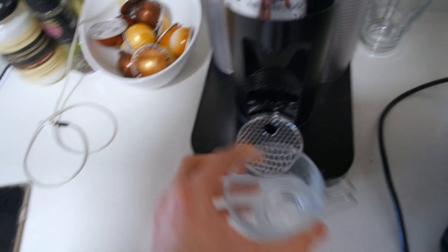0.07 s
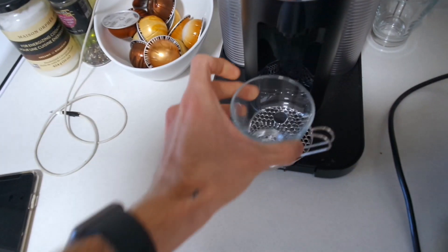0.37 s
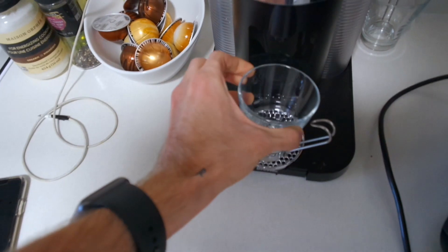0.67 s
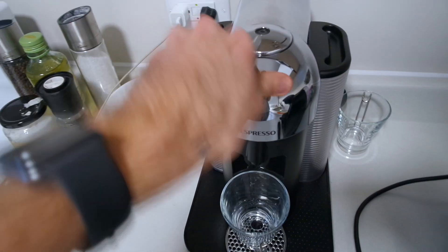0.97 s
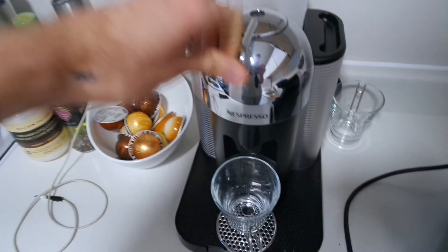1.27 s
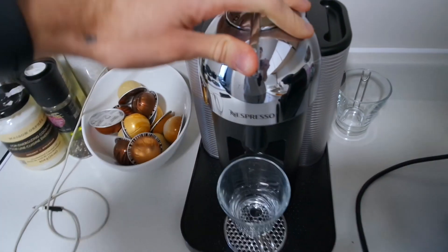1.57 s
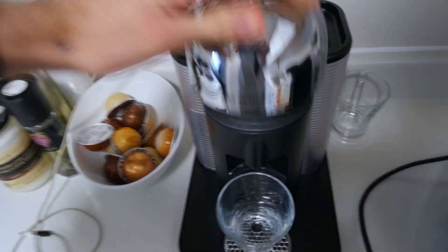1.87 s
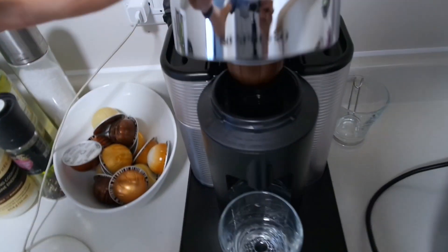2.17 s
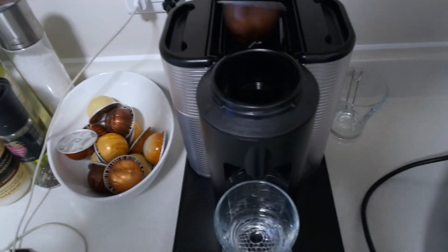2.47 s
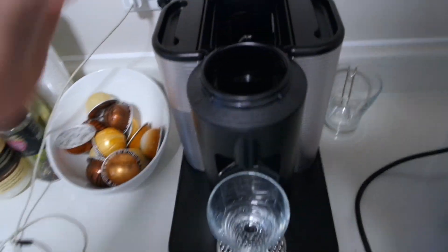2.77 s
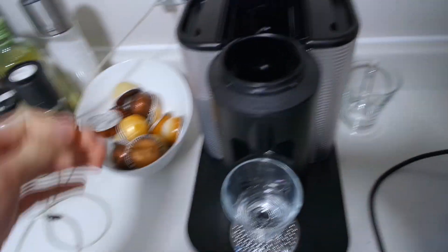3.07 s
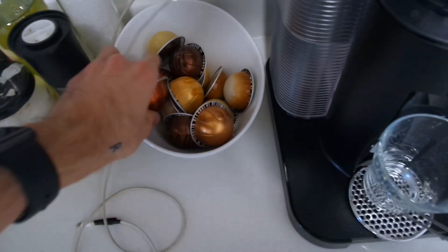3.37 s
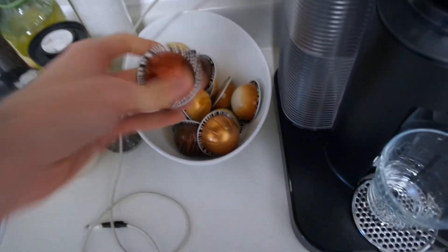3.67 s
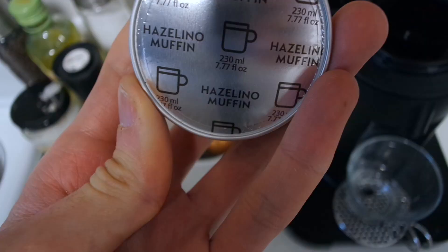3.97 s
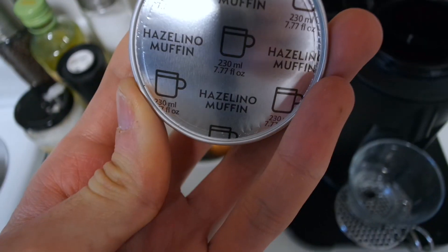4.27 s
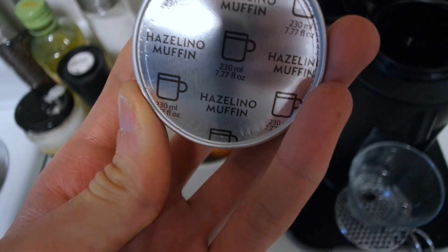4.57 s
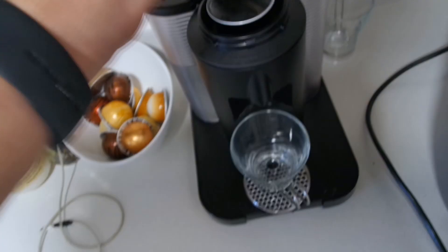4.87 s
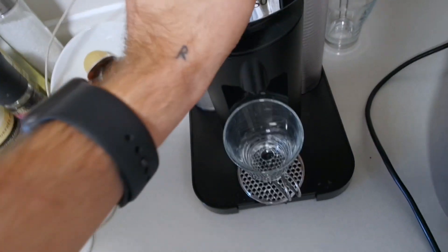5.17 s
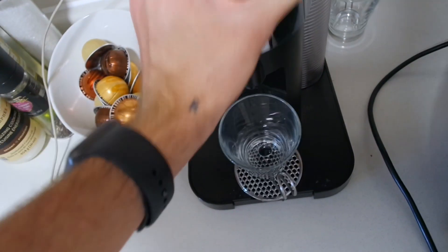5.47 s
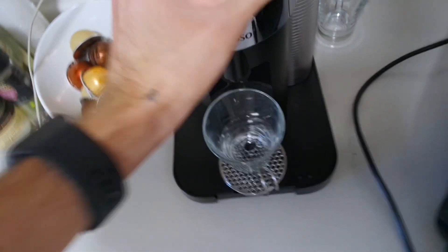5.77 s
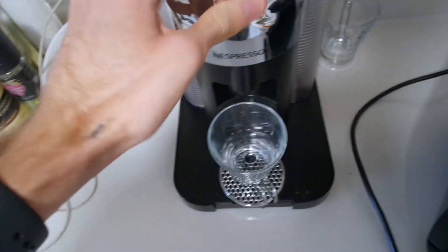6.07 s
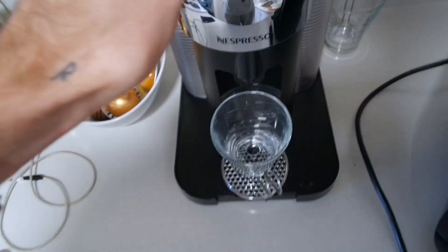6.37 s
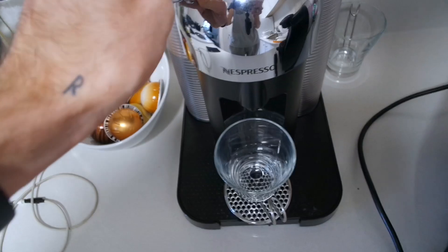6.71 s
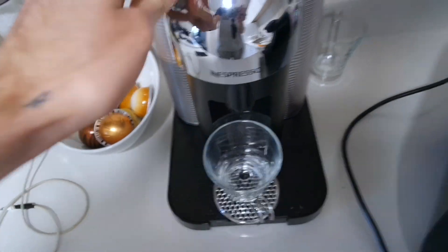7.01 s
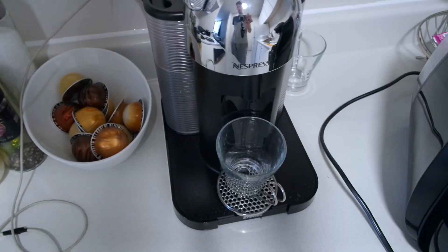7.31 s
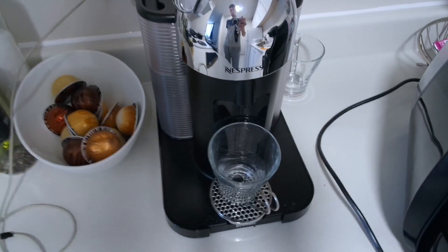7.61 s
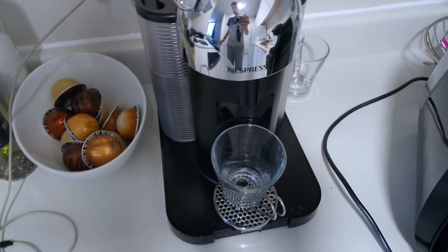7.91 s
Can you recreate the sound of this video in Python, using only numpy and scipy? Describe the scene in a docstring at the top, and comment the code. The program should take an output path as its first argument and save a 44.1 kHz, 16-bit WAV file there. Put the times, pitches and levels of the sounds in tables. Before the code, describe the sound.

Close kitchen handling: a glass rings down, a coffee machine lid clacks open, capsules rattle, the lid locks and the motor starts whirring.

```python
"""A capsule coffee machine on a kitchen counter, heard through one hand-held microphone.
A glass rings down onto the drip grid. The plastic lid unlocks and springs open, and the spent capsule
tumbles into the bin. A fresh one clinks out of a china bowl and snaps into its holder, and the lid is
shut and locked. At about 7 s the motor spins the capsule up with a rising whirr and a hiss of air.
The counter rumbles under the handling; room air and mains hum lie beneath it all."""
import sys
import numpy as np
from scipy import signal
from scipy.fft import rfft, irfft, next_fast_len
from scipy.io import wavfile
from scipy.ndimage import map_coordinates

SR = 44100
rng = np.random.default_rng(int(sys.argv[2]) if len(sys.argv) > 2 else 0)


def wav_out(sig):
    """Save sig, one row per channel (or a flat mono array), as 16-bit PCM at SR to the path in sys.argv[1]."""
    wavfile.write(sys.argv[1], SR, np.round(np.clip(np.atleast_2d(sig).T, -1, 1) * 32767).astype(np.int16))


N = 350453

# Bands of a contact: clack, thud, knock, tick. Each row: low edge in Hz, high edge in Hz.
CONTACT_BANDS_HZ = [(1200, 4500), (205, 400), (420, 1200), (4500, 15500)]
# Blows. Each row: start in seconds, then clack, low body and bright tick in relative dB.
LID_BLOWS = [(0.9624, -9, -27, -6.5), (0.974, -8, -14, 4.5), (0.9853, -3, -17, 6),
             (1.4327, -28.5, -40.5, -14), (1.4671, -32.5, -34, -26), (1.581, -43, -57, -43),
             (1.6986, -5.5, -16.5, -2.5), (1.7911, -19.5, -36.5, -10), (1.8759, -9.5, -30, -5),
             (1.9086, -11, -15.5, -3.5), (1.938, -7.5, -35, -7), (1.9594, -7.5, -25.5, 1.5),
             (2.1484, -37.5, -43.5, -28.5), (5.5174, -31.5, -38, -30), (5.604, -15.5, -28, -15),
             (5.6131, -2.5, -32, 5.5), (6.0831, -31, -36.5, -26.5), (6.0994, -34.5, -44, -34),
             (6.261, -25, -35.5, -16.5), (6.33, -23.5, -32, -22.5), (6.4423, -9.5, -18.5, -10.5),
             (6.696, -10.5, -40, 4.5), (6.7044, -3.5, -13, -14), (7.076, -40.5, -47, -47)]   # latch, hinge and lid of the plastic housing
BIN_BLOWS = [(2.4964, -27.5, -37, -35.5), (2.5805, -16, -20.5, -17.5), (2.6641, -4, -15.5, -9.5),
             (2.7172, -18.5, -14.5, -20), (2.7268, -3.5, -11.5, -10.5), (2.7635, -19, -22.5, -26),
             (2.8488, -3.5, -11, -4.5), (2.8654, -1, -10, -5), (2.92, -7, -8, -13),
             (2.948, -11.5, -16.5, -20), (2.9664, -7.5, -10.5, -10), (3.0034, -11, -14, -18),
             (3.0175, -4.5, -13, -16)]   # the spent capsule tumbles into the bin
BIN_ROCKING = [(3.0686, -14, -21, -26)]   # its first knock as it rocks to rest
HOLDER_BLOWS = [(5.0645, -13.5, -13.5, -12.5), (5.0932, 18, -41, 23), (5.097, -8.5, -38, -4),
                (5.284, -21.5, -36.5, -33.5), (5.322, -12.5, -21, -10), (5.334, -7.5, -38, -17),
                (5.3458, 4, 4, -14)]   # the fresh capsule settles in its holder
CHINA_BLOWS = [(3.3052, -11, -18, -23)]   # one capsule drops against the bowl
JOSTLE_BLOWS = [(3.3194, -11, -26, -30), (3.3629, -15, -39, -31), (3.3884, -13.5, -46, -20),
                (3.419, -15, -31, -15.5), (3.471, -14, -25.5, -31.5), (3.5389, -20, -38, -36),
                (3.603, -16.5, -36.5, -24.5)]   # aluminium capsules knock together
GLASS_BLOWS = [(0.384, -8, -15, -17.5), (0.389, -8.5, -19, -18.5), (0.553, -8.5, -16.5, -21),
               (0.5694, -15.5, -27, -24), (0.706, -47, -52, -42.5)]   # the glass lands on the metal grid
CLOSE_TICKS = [(1.2485, -21.5, -58.5, -27.5), (4.7, -50, -85, -67), (5.9174, -8, -37, -21.5),
               (7.3575, -8.5, -41, -26.5)]   # right by the microphone
# What each object rings with. Each row: pitch in Hz, relative level in dB, t60 in seconds.
LID_MODES = [(211, -1.5, 0.41), (223, -4, 0.16), (280.5, 0.5, 0.19), (315.6, -5.5, 0.29), (516, -1.5, 0.22),
             (586, -10, .3), (732.5, -6.5, 0.11), (893.4, -6, 0.15), (1240, -14.5, 0.16), (1337, -12, 0.2),
             (2354, -26.5, 0.15), (2620, -24.5, 0.25), (3770, -24, 0.16)]
HOUSING_MODES = [(219, -1.5, 0.096), (266, 2.5, 0.13), (311.5, -1, 0.14)]
CHAMBER_MODES = [(517.3, 4, 0.095), (690, 2.5, 0.051), (742, -4.5, 0.17), (848, -4, .06)]
BIN_MODES = [(232.6, -8, 0.32), (322, 0.5, 1), (370, 5, 0.13), (370.5, 4.5, .25), (567, 9, 0.16),
             (734, -10.5, 0.55), (811, -3.5, 0.25), (940, -16, 0.22), (1172, 4.5, 0.2), (1281, -11, 0.18),
             (1346, -6, 0.4), (1527, -7, 0.24), (1690, -4, 0.33), (1710, 0, .2), (1898, -14.5, .25),
             (2200, -18, 0.49), (2450, -12.5, .3), (2950, -20.5, .4)]
CHINA_MODES = [(362, 2.5, 0.17), (660, -23, 0.078), (774, 3, 0.095), (1060, -17, 0.65), (1266, -7, 0.12),
               (1620, -15.5, 0.52), (1830, -15, 0.34), (2680, -6, 0.07), (3540, -2, 0.21), (3740, -4, .1),
               (5700, -4, 0.093), (6000, -5, 0.097)]
CAPSULE_MODES = [(370, 3, 0.2), (794, 5.5, 0.079), (1340, 5.5, 0.014), (1843, -5, 0.045), (2540, -24, 0.06),
                 (3470, -14, .1), (4560, -7.5, 0.094)]
GLASS_MODES = [(158, -4.5, 0.25), (680, 4.5, 0.1), (716, -6, 0.27), (880, -16, 0.4), (913, -4, .22),
               (965, -10, 0.51), (1020, -17, 0.33), (1032, -10, 0.34), (1128, 7, 0.039), (2490, -17, .27),
               (2622, -21.5, .35), (2670, -10.5, 0.085), (3480, -17.5, 0.22), (3310, -10.5, 0.12),
               (4400, -20.5, 0.22), (4530, -15, .18), (5000, 0.5, 0.053), (6610, -30.5, .24),
               (7610, -16.5, 0.23), (10910, -23.5, 0.18), (11400, -20.5, 0.14), (14530, -8.5, 0.14)]
# The lid drives home. Each row: start in seconds, relative level in dB.
LOCK_THUMPS = [(6.449, -32), (6.708, -16.5)]
# Knocks in the brewing chamber. Each row: start in seconds, lowest mode and upper modes in relative dB.
CHAMBER_KNOCKS = [(.970, -34, -10), (1.876, -29, -46), (1.909, -11, -18), (1.961, -19, -19),
                  (5.0645, -17, -13), (6.448, -57, -24.5), (6.705, -18, -34)]
# The squeak of the locked lid settling. Each row: time in seconds, level in dB.
SQUEAK_CURVE = [(6.80, -110), (6.86, -51), (6.948, -57), (6.991, -60)]
# Hand and plastic slide and push. Each row: start and end in seconds, rub in dB, rumble in relative dB.
STROKES = [(1.03, 1.318, -55, -45), (1.73, 1.766, -36.5, -34), (1.838, 1.958, -34, -40),
           (2.0, 2.113, -46.5, -44), (2.42, 2.48, -47.5, -63), (2.517, 2.65, -55, -38.5),
           (3.388, 3.615, -43, -55), (3.68, 3.97, -66.5, -82), (4.05, 4.946, -90.5, -69.5),
           (5.75, 5.884, -62.5, -63.5), (5.952, 6.114, -51, -47), (6.343, 6.675, -48, -48),
           (6.806, 7.06, -58.5, -48)]
# The casing's resonances under the motor. Each row: centre in Hz, width in Hz, gain in dB.
CASING_RESONANCES = [(521, 14, 6.5), (551, 15, 0), (677, 12, 7), (737, 5.3, 21.5), (878, 41, 4),
                     (1070, 14, -13), (1374, 52, 3), (2222, 24, 2), (2685, 13, 15)]
# The rotor's imbalance. Each row: cycles per turn, relative level in dB.
IMBALANCE_ORDERS = [(3, -27), (4, -24), (5, -15), (12, -14.5)]
# Mains hum. Each row: pitch in Hz, level in dB.
MAINS_HUM = [(59.3, -71), (118.6, -75)]
# Spectra. Each row: frequency in Hz, relative level in dB.
WHIRR_COLOUR = [(100, -40), (230, 0), (330, -19), (410, -16), (510, 1.5), (750, -4.5), (1050, 0.5),
                (1170, -4), (1370, 1), (1560, -9.5), (2200, -2.5), (3000, -16), (4800, -13), (7000, -18)]   # the motor
HISS_COLOUR = [(2350, -0.5), (4000, -2), (4540, -4), (5160, -2), (5670, -8.5), (6580, -9.5), (12400, -11),
               (14100, -3.5), (15000, -11)]   # air at the spinning capsule
HOLDER_COLOUR = [(300, -21), (600, -18), (850, -3.5), (1250, 6), (1500, 9), (1800, -2), (2600, 7.5),
                 (3000, -28), (6000, -40), (15000, -39)]   # the holder's crowded ring
RUB_COLOUR = [(120, -43), (200, -3.5), (370, -0.5), (419, -59.5), (467, 0.5), (761, -3), (1570, -7.5),
              (15000, -17.5)]   # sliding surfaces
RUMBLE_COLOUR = [(20, -4), (38, -2), (60, -3), (80, -1.5), (120, -14), (180, -11.5), (300, -38.5)]   # counter and microphone
ECHO_COLOUR = [(60, -0.5), (150, 9), (300, -1.5), (700, 0.5), (2000, -3.5), (6000, -2.5), (15000, -0.5)]   # the kitchen's reflections
AIR_COLOUR = [(25, -17.5), (64, -6), (90, -21.5), (125, -19), (300, -23.5), (420, -22.5), (850, -29.5),
              (2000, -33.5), (5000, -37.5), (15000, -40.5)]   # the quiet room
# How long the kitchen echoes. Each row: frequency in Hz, t60 in seconds.
ECHO_T60 = [(60, 1), (200, 0.71), (600, 0.62), (3000, 0.51), (8000, 0.29), (15000, 0.1)]

MOTOR_START_S, MOTOR_ATTACK_S = 7.137, 0.036
START_SPEED_HZ, SPIN_UP_HZ_PER_S, TOP_SPEED_HZ = 23.3, 34, 47.34   # Hz here is turns per second
WHIRR_POWER, HISS_POWER = 2.44, 2.26   # whirr and hiss grow as these powers of the speed
STROKE_SWELL_DB_PER_S, STROKE_FADE_DB_PER_S = 218.5, 201
SHAKE_RISE_S, SHAKE_FOLLOWS = 0.012, 0.34   # the rumble follows this share of a blow's body dB


def lid(echo):
    """Latch, hinge and lid clack on the plastic housing, each with one quick rebound."""
    blows = rebounding(LID_BLOWS, gap_s=0.011, loss_db=8, dulling_db=5.5, count=1)
    hits = impacts(blows, thud_db=-6.5, contact_s=0.039, softening=0.18)
    return struck(hits, LID_MODES, echo, bands_db=[-3, 2.5, -1, -11.5], bass_hold=0.025,
                  rise_s=0.0012, ring_db=-6.5, room_db=-10.5, detune=0.011)


def lock():
    """The locking lever jolts the housing, whose lowest modes die quickly."""
    out = np.zeros(N)
    thump = sum((-1) ** k * ring for k, ring in enumerate(short_rings(HOUSING_MODES)))
    for start_s, db in LOCK_THUMPS:
        add(out, start_s, from_db(db) * thump)
    return out


def chamber(echo):
    """The air and walls of the brewing chamber answer some blows with a short hollow note."""
    out = np.zeros(N)
    lowest, *others = short_rings(CHAMBER_MODES)
    upper = sum((-1) ** k * ring for k, ring in enumerate(others))
    for start_s, lowest_db, upper_db in CHAMBER_KNOCKS:
        add(out, start_s, from_db(lowest_db) * lowest - from_db(upper_db) * upper)
    return in_room(out, echo, room_db=-23.5)


def rotor(turns, spread_db=4, roughness=0.35):
    """Every turn repeats the same bumps: a comb of unequal orders, roughened by noise."""
    orders = np.arange(1, 129)
    strengths = from_db(spread_db * rng.standard_normal(len(orders)).clip(-2, 1.5))
    cycles = np.outer(np.arange(1024) / 1024, orders) + rng.random(len(orders))
    one_turn = np.sin(2 * np.pi * cycles) @ strengths
    bumps = map_coordinates(one_turn, [turns % 1 * len(one_turn)], order=1, mode="grid-wrap")
    return rms_one(bumps) + roughness * rng.standard_normal(N)


def motor(echo, wobble=0.0011):
    """The motor gains speed evenly up to its top; its orders climb through the casing's resonances."""
    t = seconds(N)
    running_s = np.maximum(t - MOTOR_START_S, 0)
    speed = np.minimum(START_SPEED_HZ + SPIN_UP_HZ_PER_S * running_s, TOP_SPEED_HZ)
    unsteady = 1 + wobble * rms_one(band(rng.standard_normal(N), 12, 40))
    turns = np.cumsum(speed * unsteady) / SR
    shake = rotor(turns)
    casing = shake + sum(from_db(db) * resonance(shake, hz, width) for hz, width, db in CASING_RESONANCES)
    # the echo still holds the slower speed of a moment ago, so the orders beat and flicker
    whirr = from_db(2) * coloured(in_room(casing, echo, room_db=-5), WHIRR_COLOUR)
    imbalance = sum(from_db(db) * np.sin(2 * np.pi * order * turns) for order, db in IMBALANCE_ORDERS)
    hum = from_db(-14) * np.sin(2 * np.pi * MAINS_HUM[0][0] * t)
    drive = from_db(-27.5) * (speed / TOP_SPEED_HZ) ** WHIRR_POWER
    hiss = from_db(-31) * (speed / TOP_SPEED_HZ) ** HISS_POWER * noise(HISS_COLOUR)
    return (drive * (whirr + imbalance + hum) + hiss) * np.minimum(running_s / MOTOR_ATTACK_S, 1)


def spent_capsule(echo):
    """The capsule bounces and rocks to rest in the bin, a small plastic box with almost no bass."""
    bounces = rebounding(BIN_BLOWS, gap_s=0.01, loss_db=9.5, dulling_db=-1.5, count=2)
    rocking = rebounding(BIN_ROCKING, gap_s=0.019, loss_db=2, dulling_db=0.5, count=5)
    hits = impacts(bounces + rocking, thud_db=-0.5, contact_s=0.046, softening=0.12)
    clatter = struck(hits, BIN_MODES, echo, bands_db=[-5.5, 0, 1, 1], bass_hold=0.2,
                     rise_s=0.0011, ring_db=-15.5, room_db=-8.5, detune=0.005)
    thin_walls = signal.butter(4, 220, "high", fs=SR, output="sos")
    abrupt_stop = from_db(np.interp(seconds(N), [3.235, 3.25], [0, -35]))
    return signal.sosfilt(thin_walls, clatter) * abrupt_stop


def fresh_capsule(echo, seating_s=5.346):
    """The capsule clacks in and snaps home; the holder's many close modes blur into one short tail."""
    hits = impacts(HOLDER_BLOWS, thud_db=-25, contact_s=0.026, softening=0.78)
    cracks = contacts(hits, bands_db=[-11, 2.5, -7.5, -9.5], bass_hold=0.093, rise_s=0.00043)
    out = in_room(cracks, echo, room_db=-19)
    add(out, seating_s, from_db(-17) * noise(HOLDER_COLOUR)[:SR] * dying(seconds(SR), t60=0.19))
    return out


def china_bowl(echo):
    """One capsule drops against the bowl and sets the china ringing."""
    hits = impacts(CHINA_BLOWS, thud_db=-1.5, contact_s=0.047, softening=0.088)
    return struck(hits, CHINA_MODES, echo, bands_db=[-8.5, -13, 0.5, -11], bass_hold=0.21,
                  rise_s=0.00028, ring_db=-3.5, room_db=-8, detune=0.00052)


def jostling_capsules(echo):
    """Aluminium capsules knock against each other in the bowl and ring briefly."""
    blows = rebounding(JOSTLE_BLOWS, gap_s=0.015, loss_db=11.5, dulling_db=5.5, count=1)
    hits = impacts(blows, thud_db=-5, contact_s=0.03, softening=0.21)
    return struck(hits, CAPSULE_MODES, echo, bands_db=[-9.5, -2, -11.5, 0], bass_hold=0.31,
                  rise_s=0.00022, ring_db=-6.5, room_db=-11.5, detune=0.03)


def glass(echo):
    """The glass lands on the metal drip grid in a few ringing knocks."""
    hits = impacts(GLASS_BLOWS, thud_db=-4.5, contact_s=0.028, softening=0.055)
    return struck(hits, GLASS_MODES, echo, bands_db=[-5, 1, 2, -5.5], bass_hold=0.27,
                  rise_s=0.0005, ring_db=-7, room_db=-6.5, detune=0.0022)


def close_ticks():
    """Bright ticks right by the microphone, with no room on them."""
    hits = impacts(CLOSE_TICKS, thud_db=-13.5, contact_s=0.0098, softening=0.08)
    ticks = contacts(hits, bands_db=[-13.5, 4, 6.5, 12], bass_hold=0.21, rise_s=0.00059)
    return ticks + from_db(8) * resonance(ticks, hz=4800, width_hz=1300)


def hand_pressure():
    """Each stroke swells, holds and fades; gives the gains of its rubbing and of its rumble."""
    t, gains = seconds(N), np.zeros((2, N))
    for start_s, end_s, *levels_db in STROKES:
        drop_db = np.maximum(STROKE_SWELL_DB_PER_S * (start_s - t), STROKE_FADE_DB_PER_S * (t - end_s))
        gains = np.maximum(gains, np.outer(from_db(levels_db), from_db(-drop_db.clip(0, 200))))
    return gains


def rubbing(press, grain_db=4.5):
    """Sliding surfaces catch in countless tiny slips of uneven size."""
    slips = rng.standard_normal(N) * from_db(grain_db * rng.exponential(1, N).clip(0, 6))
    return press * coloured(slips, RUB_COLOUR)


def squeak(hz=2770, width_hz=35):
    """Tight plastic creeps and gives a thin, unsteady note."""
    level_db = np.interp(seconds(N), *np.transpose(SQUEAK_CURVE), left=-200, right=-200)
    note = resonance(rng.standard_normal(N), hz, width_hz)
    return from_db(level_db) * rms_one(resonance(note, hz, width_hz))


def shaking(blows, level_db, t60):
    """Power that an object's blows put into the counter; it builds quickly and dies slowly."""
    power, t = np.zeros(N), seconds(SR)
    swell = (1 - np.exp(-t / SHAKE_RISE_S)) * dying(t, t60)
    for start_s, _, body_db, _ in blows:
        add(power, start_s, (from_db(level_db + SHAKE_FOLLOWS * body_db) * swell) ** 2)
    return power


def counter_rumble(push):
    """The counter and the hand-held microphone rumble with the blows and pushes."""
    power = (push ** 2 + shaking(GLASS_BLOWS, level_db=-22, t60=0.34)
             + shaking(LID_BLOWS, level_db=-30.5, t60=0.3)
             + shaking(BIN_BLOWS, level_db=-37.5, t60=1.0)
             + shaking(JOSTLE_BLOWS, level_db=-26, t60=0.39)
             + shaking(HOLDER_BLOWS, level_db=-30, t60=0.15))
    return np.sqrt(power) * band(noise(RUMBLE_COLOUR), 14, 380)


def kitchen_echo(build_s=0.0059, early_db=8, early_t60=0.15):
    """The room's answer to a click: a quick flurry from counter and wall, then dense reflections."""
    t, out = seconds(SR), 0
    octaves_hz = 40 * 2. ** np.arange(10)
    for low_hz, high_hz in zip(octaves_hz, octaves_hz[1:]):
        hz = np.sqrt(low_hz * high_hz)
        decay = dying(t, at_hz(ECHO_T60, hz)) + from_db(early_db) * dying(t, early_t60)
        reflections = band(rng.standard_normal(SR), low_hz, high_hz)
        out = out + reflections * from_db(at_hz(ECHO_COLOUR, hz)) * decay
    out = out * (1 - np.exp(-t / build_s))
    return out / np.linalg.norm(out)


def room_tone(air_db=-63):
    """Quiet kitchen air and mains hum."""
    hum = sum(np.sqrt(2) * from_db(db) * np.sin(2 * np.pi * hz * seconds(N)) for hz, db in MAINS_HUM)
    return hum + from_db(air_db) * noise(AIR_COLOUR)


def rebounding(blows, gap_s, loss_db, dulling_db, count):
    """A loose part strikes again at uneven gaps, weaker each time; duller if dulling_db is positive."""
    rows = []
    uneven = rng.uniform(0.65, 1.35, (len(blows), count))
    for (start_s, clack_db, body_db, tick_db), gaps in zip(blows, uneven):
        for k, delay_s in enumerate(np.cumsum([0, *gaps]) * gap_s):
            rows.append((start_s + delay_s, clack_db - k * loss_db,
                         body_db - k * (loss_db - dulling_db), tick_db - k * (loss_db + dulling_db)))
    return rows


def impacts(blows, thud_db, contact_s, softening):
    """Weaker blows last longer. Each hit: start in seconds, four band levels in dB, t60 in seconds."""
    return [(start_s, clack_db, body_db + thud_db, body_db, tick_db,
             contact_s * from_db(-softening * clack_db)) for start_s, clack_db, body_db, tick_db in blows]


def contacts(hits, bands_db, bass_hold, rise_s):
    """Each hit is a crack of crowded, heavily damped vibration; the low bands hold on longer."""
    out, t = np.zeros(N), seconds(SR // 8)
    hits = np.array(hits)
    white = rng.standard_normal((len(hits), len(CONTACT_BANDS_HZ), len(t)))
    for k, (low_hz, high_hz) in enumerate(CONTACT_BANDS_HZ):
        t60 = hits[:, -1:] * (CONTACT_BANDS_HZ[0][0] / low_hz) ** bass_hold
        shape = dying(t, t60) * (1 - np.exp(-t / rise_s))
        cracks = band(white[:, k] * shape, low_hz, high_hz)
        cracks *= (np.linalg.norm(shape, axis=1) / np.linalg.norm(cracks, axis=1))[:, None]
        for hit, crack in zip(hits, cracks):
            add(out, hit[0], from_db(hit[1 + k] + bands_db[k]) * crack)
    return out


def ringing(hits, modes, detune, scatter_db=1):
    """Each hit rings the modes by its strength at their pitch; loose parts shift them a little."""
    out, t = np.zeros(N), seconds(SR // 2)
    hz, mode_db, t60 = np.transpose(modes)
    decays = dying(t, t60[:, None])
    centres_hz = np.sqrt(np.prod(CONTACT_BANDS_HZ, axis=1))
    for start_s, *levels_db, _ in hits:
        scatter, polarity, shift = rng.standard_normal((3, len(hz)))
        strength = from_db(at_hz(zip(centres_hz, levels_db), hz) + mode_db + scatter_db * scatter)
        phase = np.outer(2 * np.pi * hz * (1 + detune * shift), t)
        add(out, start_s, (np.sign(polarity) * strength) @ (np.sin(phase) * decays))
    return out


def struck(hits, modes, echo, bands_db, bass_hold, rise_s, ring_db, room_db, detune):
    """A knocked object: contact cracks, their echo in the room, and the object's ring."""
    cracks = contacts(hits, bands_db, bass_hold, rise_s)
    return in_room(cracks, echo, room_db) + from_db(ring_db) * ringing(hits, modes, detune)


def short_rings(modes):
    """One dying sine for each mode."""
    t = seconds(SR // 4)
    return [from_db(db) * np.sin(2 * np.pi * hz * t) * dying(t, t60) for hz, db, t60 in modes]


def in_room(direct, echo, room_db):
    """What reaches the microphone: the direct sound and its echo."""
    return direct + from_db(room_db) * signal.oaconvolve(direct, echo)[:N]


def from_db(db):
    """Decibels to gain."""
    return 10 ** (np.asarray(db) / 20)


def rms_one(x):
    """Scale to rms 1."""
    return x / np.sqrt(np.mean(x ** 2) + 1e-20)


def seconds(size):
    """A time axis."""
    return np.arange(size) / SR


def dying(t, t60):
    """An exponential decay that loses 60 dB in t60 seconds."""
    return np.exp(-np.log(1000) * t / np.maximum(t60, 1e-3))


def at_hz(points, hz):
    """Read a table on a log-frequency axis."""
    points_hz, values = np.transpose(sorted(points))
    return np.interp(np.log(np.maximum(hz, 1)), np.log(points_hz), values)


def band(x, low_hz, high_hz):
    """Causal band-pass."""
    edges_hz = [low_hz, min(high_hz, 0.45 * SR)]
    return signal.sosfilt(signal.butter(2, edges_hz, "band", fs=SR, output="sos"), x)


def coloured(x, colour):
    """Give a steady sound a spectrum; rms 1."""
    size = next_fast_len(N, True)
    gains = from_db(at_hz(colour, np.fft.rfftfreq(size, 1 / SR)))
    return rms_one(irfft(rfft(x, size) * gains, size)[:N])


def noise(colour):
    """Coloured noise; rms 1."""
    return coloured(rng.standard_normal(N), colour)


def resonance(x, hz, width_hz):
    """A resonance with gain 1 at its peak."""
    r = np.exp(-np.pi * width_hz / SR)
    feedback = [1, -2 * r * np.cos(2 * np.pi * hz / SR), r * r]
    return signal.lfilter(np.array([1, 0, -1]) * (1 - r * r) / 2, feedback, x)


def add(out, start_s, sound):
    """Mix a sound in at a time."""
    start = int(start_s * SR)
    out[start:start + len(sound)] += sound[:N - start]


def scene():
    """The handling, then the motor, all in one kitchen and in mono."""
    echo = kitchen_echo()
    housing = lid(echo) + lock() + chamber(echo)
    capsules = spent_capsule(echo) + china_bowl(echo) + jostling_capsules(echo) + fresh_capsule(echo)
    press, push = hand_pressure()
    handling = glass(echo) + close_ticks() + rubbing(press) + squeak() + counter_rumble(push)
    return (housing + capsules + handling + motor(echo) + room_tone())[None]


def record(dry, cutoff_hz=15200):
    """The recorder rounds off the loudest peaks and cuts the top."""
    rounded = dry / (1 + dry ** 4) ** 0.25
    return signal.sosfilt(signal.ellip(10, 0.2, 70, cutoff_hz, fs=SR, output="sos"), rounded)


dry = scene()
out = record(dry)
wav_out(out)
```